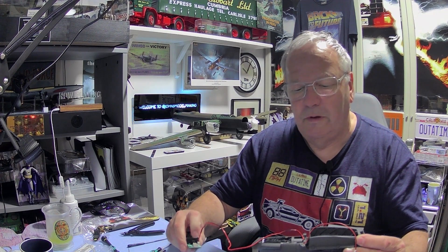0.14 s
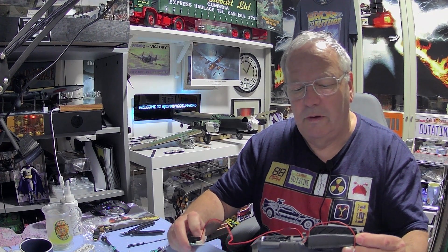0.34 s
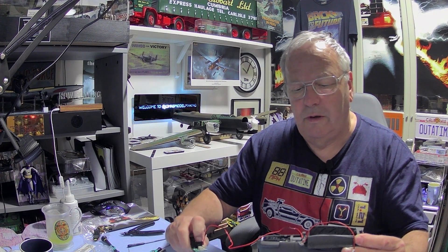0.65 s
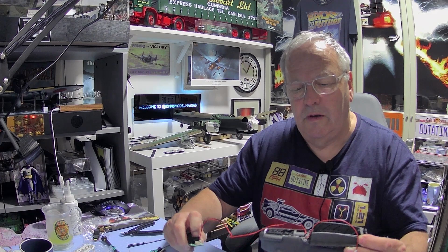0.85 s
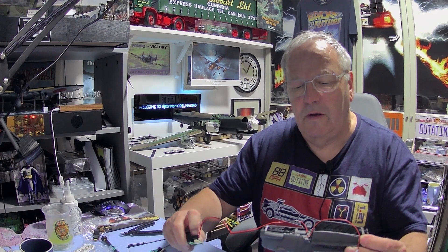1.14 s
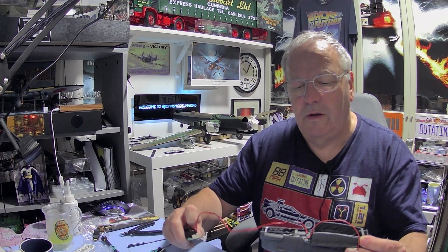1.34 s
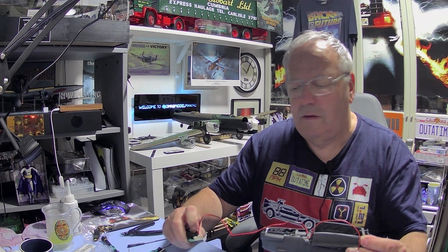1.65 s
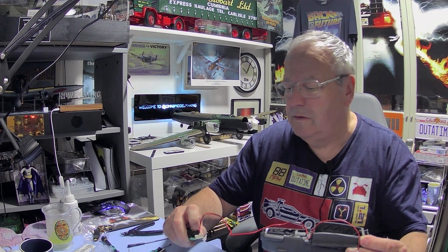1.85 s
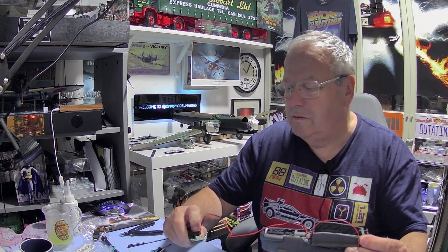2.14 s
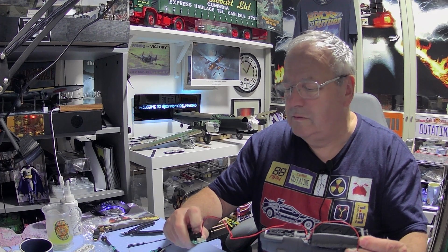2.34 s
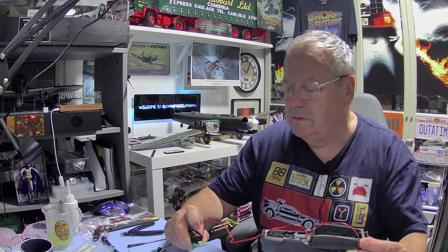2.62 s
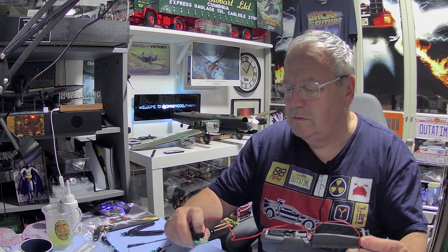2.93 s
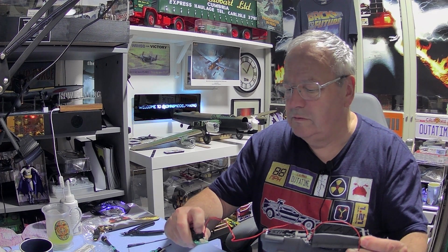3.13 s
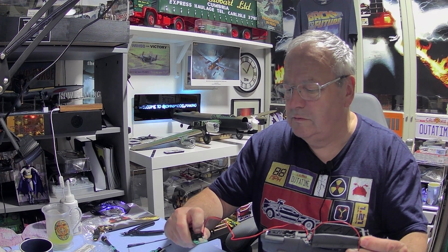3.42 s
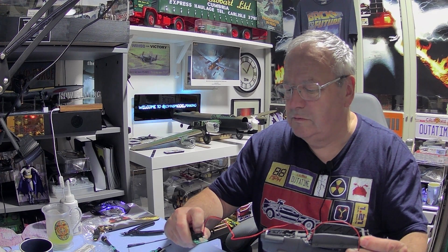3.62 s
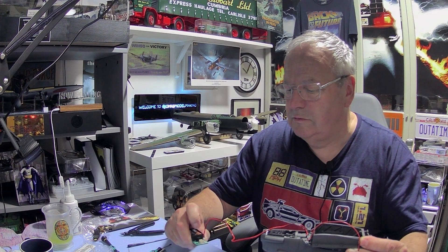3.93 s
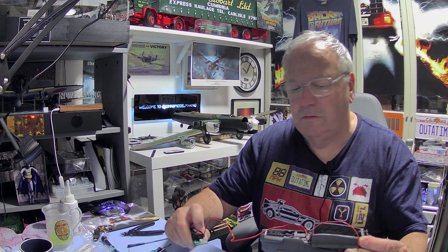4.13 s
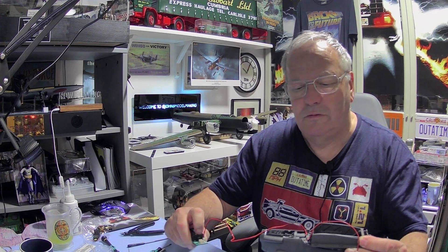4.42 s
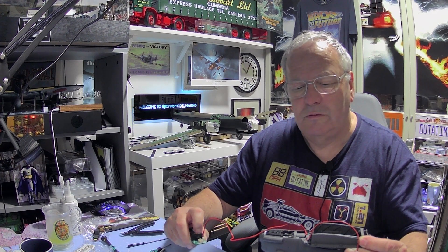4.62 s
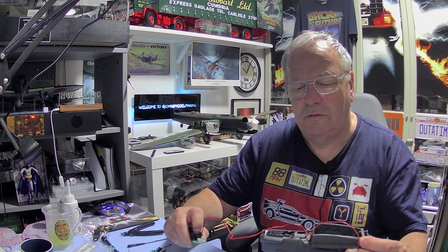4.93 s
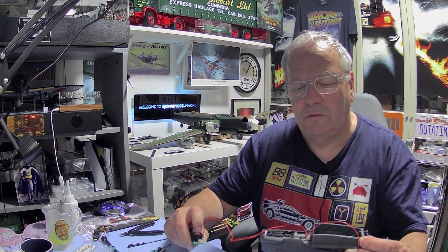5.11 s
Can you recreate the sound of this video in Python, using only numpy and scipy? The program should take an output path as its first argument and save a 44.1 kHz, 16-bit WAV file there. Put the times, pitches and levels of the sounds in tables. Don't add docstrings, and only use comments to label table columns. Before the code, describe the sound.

Buzzy whine of a tiny brushed motor, cut off and restarted by hard switch clicks, with near-silent room pauses between runs.

```python
import sys
import numpy as np
from scipy import signal
from scipy.fft import rfft, irfft, next_fast_len
from scipy.io import wavfile
from scipy.ndimage import uniform_filter1d

SR = 44100
rng = np.random.default_rng(int(sys.argv[2]) if len(sys.argv) > 2 else 0)


def ratio(d):
    e = np.asarray(d, float) / 20
    return 10 ** e


def master_out(mix):
    frames = np.transpose(np.atleast_2d(mix))
    ceiling = np.clip(frames, -1, 1)
    pcm = np.round(ceiling * 32767).astype(np.int16)
    wavfile.write(sys.argv[1], SR, pcm)


N = 232377


def unit(x):
    return x / np.sqrt(np.mean(x ** 2) + 1e-20)


def along(points, hz):
    f, v = np.transpose(points)
    return np.interp(np.log(hz + 1), np.log(f + 1), v)


def wobble(rate):
    knots = rng.standard_normal(int(N * rate / SR) + 2)
    return np.interp(np.arange(N) * rate / SR, np.arange(len(knots)), knots)


def filtered(x, response):
    m = next_fast_len(len(x) + 8192)
    return irfft(rfft(x, m) * response(np.fft.rfftfreq(m, 1 / SR)), m)[:len(x)]


def resonance(f, hz, width_hz):
    return 1j * f * width_hz / (hz * hz - f * f + 1j * f * width_hz)


def patchy(patchy_db, size, wide, long):
    hz, _, z = signal.stft(rng.standard_normal(N + size), SR, nperseg=size)
    field = uniform_filter1d(rng.standard_normal(z.shape), int(wide), 0)
    field = uniform_filter1d(field, int(long), 1)
    depth_db = patchy_db * np.clip(.45 + hz / 11000, 0, 1)[:, None]
    gain = ratio(depth_db * np.clip(unit(field), -3, 1.8))
    return signal.istft(z * gain, nperseg=size)[1][:N]


def motor():
    # rotor starts in seconds, current off in seconds, brush noise in dB, whine above that in dB.
    runs = [
        (-1, 1.124, -50.3, -7),
        (1.135, 2.008, -50.5, -5),
        (2.272, 2.968, -50, -7),
        (3.535, 4.598, -49.7, -7),
        (4.94, 6, -49.5, -6.5),
    ]
    # time in seconds, shaft turns in Hz.
    full_speed = [(0, 158.2), (.35, 156.7), (.66, 154.9), (1.12, 153), (1.13, 152.8), (2.1, 152.5),
                  (2.11, 160), (2.5, 159.8), (2.64, 158.3), (3.05, 155.7), (3.06, 165.3), (3.7, 164.9),
                  (3.9, 163), (4.29, 157.8), (4.7, 156.7), (4.71, 165), (5.27, 165.2)]
    spin_up_s, coast_hz_per_s = .023, 350
    louder_with_speed, whine_with_speed = 1.5, 1.1
    fade_db_per_s, whine_fade_db_per_s = 520, 500

    t = np.arange(N) / SR
    starts = np.maximum([run[0] for run in runs], [-1] + [run[1] for run in runs[:-1]])
    run = np.searchsorted(starts, t) - 1
    on_s, off_s, brush_db, whine_db = np.array(runs)[run].T
    backward = run == 1
    share = 1 - np.exp(-(t - on_s) / spin_up_s)
    idle_s = np.maximum(t - off_s, 0)
    shaft_hz = share * np.interp(t, *np.transpose(full_speed)) - coast_hz_per_s * idle_s
    shaft_hz = np.maximum(shaft_hz, 120)
    turns = np.cumsum(shaft_hz * (1 + .004 * wobble(30))) / SR
    surging = np.abs(np.gradient(uniform_filter1d(shaft_hz, size=1300))) * SR
    rough = 1 + surging / 90 + 8 * (1 - share)

    level = share ** louder_with_speed * ratio(brush_db - fade_db_per_s * idle_s)
    whine_gain = share ** whine_with_speed * ratio(whine_db - 4 - whine_fade_db_per_s * idle_s)
    whine = filtered(shaft_whine(turns, backward, rough), casing_gaps)
    return level * ratio(-1.0) * brush_scrape(turns), level * whine_gain * whine / rough ** 0.27


def shaft_whine(turns, backward, rough):
    # multiple of shaft speed, level in dB.
    forward_orders = [(1, -11.5), (2, -18), (3, -13.5), (4, -10), (5, -6), (6, 3.5), (7, -10), (8, 4.5),
                      (9, -11), (10, -11), (11, -3), (12, -5.5), (13, -6.5), (14, -4), (15, -7.5), (16, -5),
                      (17, -2), (18, -13), (19, -9), (20, -11.5), (21, -8), (22, -15), (23, -9), (24, -16)]
    # multiple of shaft speed, level in dB.
    backward_orders = [(1, -15.5), (2, -23.5), (3, -16), (4, -9), (5, -6.5), (6, -6), (7, -6), (8, 3.5),
                       (9, -11.5), (10, -10), (11, -12), (12, 0.5), (13, -6), (14, -11.5), (15, -7),
                       (16, -16), (17, -16), (18, -11), (19, -21.5), (20, -10.5), (21, -12.5), (22, -16.5),
                       (23, -15), (24, -18)]
    # multiple of shaft speed, forward level in dB, backward level in dB.
    pinion = [(25, -14, -16), (26, -16, -13), (29, -17, -15), (31, -13, -8), (32, -13, -16), (33, -14, -8)]
    orders = [(k, ahead, back) for (k, ahead), (_, back) in zip(forward_orders, backward_orders)]
    whine = 0
    for k, ahead_db, back_db in [*orders, *pinion]:
        level_db = np.where(backward, back_db, ahead_db) + 1.2 * wobble(7) + 3 * wobble(40)
        slip = rng.uniform() + (.045 + .0015 * k) * rough * wobble(60)
        if k <= 3:
            slip = slip + 0.28 * wobble(55)
        whine = whine + ratio(level_db) * np.sin(2 * np.pi * (k * turns + slip))
    return whine


def brush_scrape(turns):
    # frequency in Hz, level in dB.
    brush = [(240, -63), (400, -32.5), (917, -3.5), (1200, -12), (1310, -4.5), (2220, -13), (4300, -18.5),
             (6840, -14.5), (11500, -16), (15000, -58.5), (22000, -120)]
    # frequency in Hz, width in Hz, level in dB.
    casing = [(2083, 130, -6), (2210, 110, 2.5), (2570, 196, -3), (3300, 130, -7.5), (3820, 120, -10),
              (5100, 150, -9), (5770, 340, -7.5), (6750, 730, -1.5), (6940, 170, -12), (8010, 210, -7),
              (8570, 160, -14), (9520, 120, -7.5), (10430, 250, -11), (11050, 280, -20)]

    def colour(f):
        power = ratio(2 * along(brush, f) - 13.5)
        for hz, width_hz, db in casing:
            power = power + ratio(2 * db) * np.abs(resonance(f, hz, width_hz)) ** 2
        return np.sqrt(power) * casing_gaps(f)

    bars = 1 + .3 * np.cos(2 * np.pi * turns) + .25 * np.cos(4 * np.pi * turns + 1.2)
    mottling = patchy(4.4, size=512, wide=6, long=7)
    chatter = patchy(4.7, size=128, wide=3, long=4.3)
    return unit(filtered(bars * (mottling + .7 * chatter), colour))


def casing_gaps(f):
    # frequency in Hz, width in Hz, depth from 0 to 1.
    notches = [(1060, 95, .92), (1125, 85, .95), (1520, 110, .5), (1700, 140, .7), (4375, 600, .45),
               (6270, 130, .6), (7490, 310, 1)]
    return np.prod([1 - depth * resonance(f, hz, width_hz) for hz, width_hz, depth in notches], axis=0)


def switch():
    # start in seconds, peak in dB, ring in Hz, share of broad crack in dB.
    snaps = [(1.1320, -22, 2400, -8), (1.1337, -11, 2620, -9), (1.1365, -16, 5400, -6),
             (2.1153, -16, 1300, 5), (2.1180, -13, 6900, 3), (2.1212, -17, 7900, 0),
             (2.2456, -6.5, 2830, 1), (2.2464, -7, 6740, -9), (2.249, -10, 4400, -5),
             (3.0943, -21, 8200, -2), (3.096, -20.5, 3200, -5.5), (3.0985, -26.5, 8500, -3),
             (3.5100, -27, 3900, -8), (3.5113, -27, 4250, -12), (3.5152, -30, 2300, -6),
             (3.5172, -23, 3050, -10), (4.6735, -25, 4420, -11), (4.676, -29, 3500, -4),
             (4.918, -29, 4400, -7), (4.9238, -32, 2200, -6), (4.9262, -25, 2750, -7)]
    # start in seconds, peak in dB, ring in Hz, broad crack in dB.
    ticks = [(1.1208, -40, 2600, 0), (1.149, -27, 2750, -10), (2.035, -57, 820, -18), (2.101, -57, 3000, 0),
             (3.222, -59, 3220, -4), (4.186, -38, 2210, -12), (4.894, -57, 4360, 0),
             (5.14, -36, 2230, -19.5)]
    first_rise_s, bounce_rise_s, tick_rise_s = .0012, .0005, .0013
    snap_t60_s, tick_t60_s = .011, .035
    first = np.diff([row[0] for row in snaps], prepend=0) > snap_t60_s
    contacts = [(*row, first_rise_s if new else bounce_rise_s, snap_t60_s) for row, new in zip(snaps, first)]
    contacts += [(*row, tick_rise_s, tick_t60_s) for row in ticks]

    out, lead = np.zeros(N + SR), 441
    t = (np.arange(SR // 4) - lead) / SR
    for s, db, hz, crack_db, rise_s, t60_s in contacts:
        burst = contact(t, lead, s, db, hz, crack_db, rise_s, t60_s)
        near = burst + ratio(min(crack_db, -1.5) + 0.46 * db - 11) * shell_ring(t)
        out[round(s * SR) - lead:][:len(t)] += ratio(db) * (near + ratio(-5.5) * room(near))
    return filtered(out[:N], lambda f: (1j * f / (340 + 1j * f)) ** 3 + ratio(-9) * resonance(f, 100, 149.9))


def contact(t, lead, s, db, hz, crack_db, rise_s, t60_s):
    # frequency in Hz, level in dB.
    closing = [(180, -71), (300, -38.5), (821, -9), (1580, -11.5), (2740, 2.5), (4470, -7.5), (4890, -5),
               (6740, -7.5), (11500, -11), (15000, -69.5), (22000, -120)]
    # frequency in Hz, level in dB.
    release = [(180, -66), (300, -28.5), (1930, -8), (2320, -11), (2660, -7), (5610, -3), (6850, -3.5),
               (8350, -5), (11500, -6), (15000, -40.5), (22000, -120)]
    opening = [
        (2.116, 2.2),
        (3.05, 3.15),
    ]
    thin_hz_per_db, firm_db = 80, -16
    body = release if any(a < s < b for a, b in opening) else closing
    thin_hz = thin_hz_per_db * np.clip(firm_db - db, 0, 10)

    def colour(f):
        crack = ratio(along(body, f) + crack_db)
        ring = .7 * resonance(f, hz, .21 * hz) ** 2 + .8 * resonance(f, hz, .022 * hz)
        return (crack + ring) * (1j * f / (1 + thin_hz + 1j * f)) ** 2

    shape = ratio(np.where(t < 0, 8 * t / rise_s, -60 * t / t60_s))
    push = shape * rng.standard_normal(len(t))
    push[lead] = 2.6
    burst = filtered(push, colour)
    return .58 * np.linalg.norm(shape) * burst / np.linalg.norm(burst)


def shell_ring(t):
    # frequency in Hz, level in dB, t60 in seconds.
    shell = [(918, -21.5, 0.08), (1870, -12.5, 0.042), (2650, -16, .12), (2900, -11.5, 0.042),
             (4350, -9.5, 0.039)]
    after = np.maximum(t, 0)
    ring = 0
    for hz, db, t60_s in shell:
        decay = ratio(db + rng.normal(0, 3) - 60 * after / t60_s)
        ring = ring + decay * np.sin(2 * np.pi * hz * after)
    return ring


def room(x):
    # frequency in Hz, t60 in seconds.
    decay = [(300, 0.56), (1000, .18), (3000, 0.16), (7000, 0.12), (11000, 0.19)]
    hz, t, z = signal.stft(rng.standard_normal(SR // 3), SR, nperseg=128)
    tail = signal.istft(z * ratio(-60 * t / along(decay, hz)[:, None]), SR, nperseg=128)[1]
    delayed = np.pad(x, (220, 0))
    return signal.fftconvolve(delayed, tail / np.linalg.norm(tail))[:len(x)]


def air():
    # frequency in Hz, level in dB.
    hum_and_hiss = [(12, -33.5), (20, -3), (59, -10.5), (139, -18.5), (182, -10), (250, -19.5), (271, -12),
                    (301, -18), (373, -19), (449, -25.5), (555, -19.5), (601, -23.5), (11500, -33),
                    (15000, -66.5), (22000, -120)]
    noise = patchy(4, size=512, wide=7.5, long=6.1)
    return ratio(-70) * unit(filtered(noise, lambda f: ratio(along(hum_and_hiss, f))))


def scene():
    scrape, whine = motor()
    reflected = room(ratio(-5) * scrape + ratio(-12) * whine)
    return (scrape + whine + reflected + switch() + air())[None]


def band_limit(x):
    return signal.sosfilt(signal.butter(12, 12890, fs=SR, output="sos"), x)


def record(dry):
    # frequency in Hz, gain in dB.
    top = [(11550, -0.5), (11650, -8), (12000, -44), (12800, -54), (13500, -75)]
    # from and to in seconds, treble gain in dB.
    dropouts = [
        (2.104, 2.109, -25),
        (2.234, 2.239, -25),
        (3.087, 3.09, -15),
        (3.493, 3.502, -34),
        (4.903, 4.911, -12),
    ]
    x = filtered(dry[0], lambda f: ratio(along(top, f)))
    treble = filtered(x, lambda f: np.clip(f / 600 - 1.8, 0, 1))
    t = np.arange(N) / SR
    lost = sum((1 - ratio(db)) * ((t > start) & (t < end)) for start, end, db in dropouts)
    mix = x - treble * uniform_filter1d(lost, size=40)
    return band_limit(mix[None])


dry = scene()
out = record(dry)
master_out(out)
```